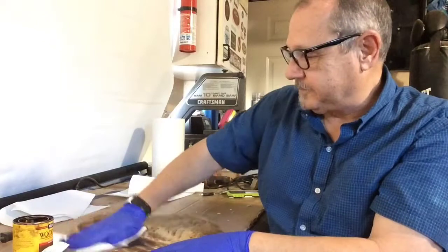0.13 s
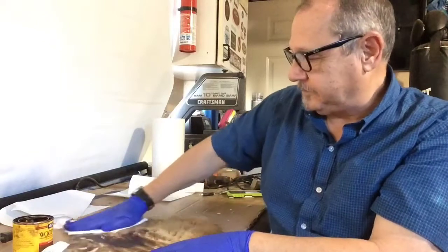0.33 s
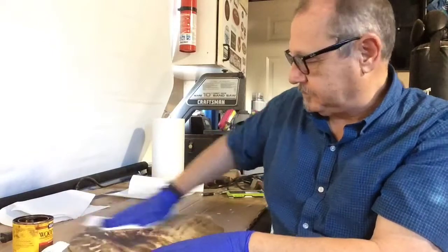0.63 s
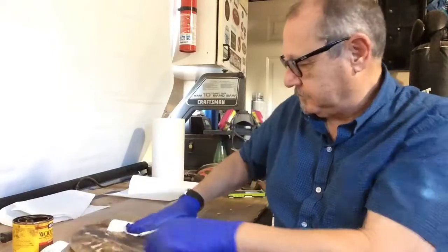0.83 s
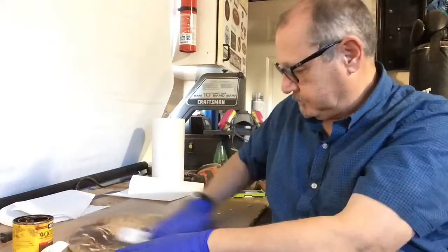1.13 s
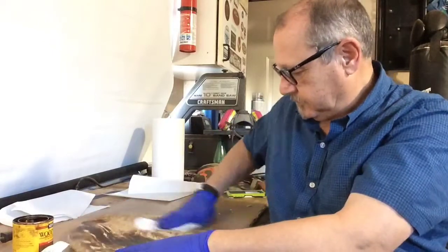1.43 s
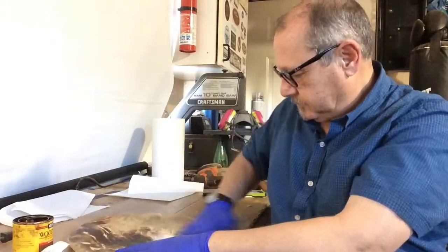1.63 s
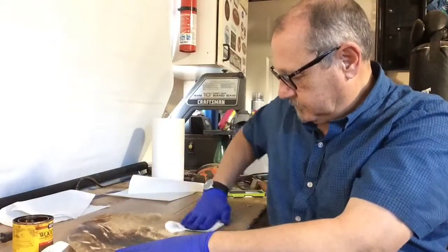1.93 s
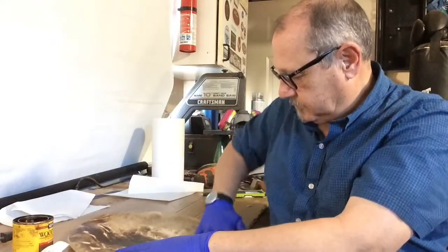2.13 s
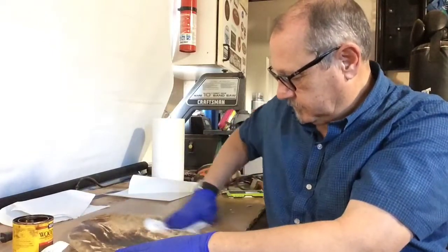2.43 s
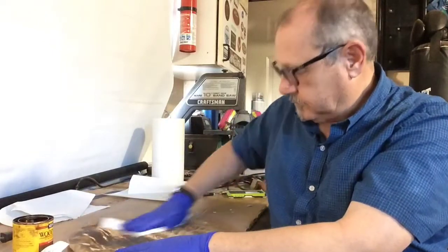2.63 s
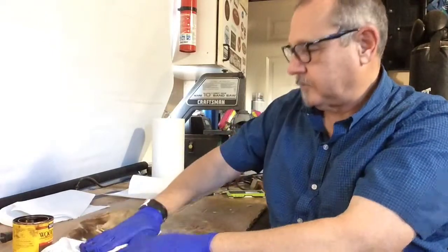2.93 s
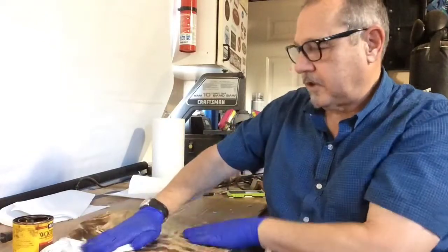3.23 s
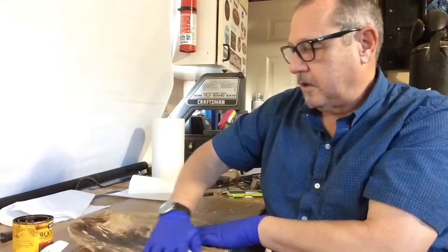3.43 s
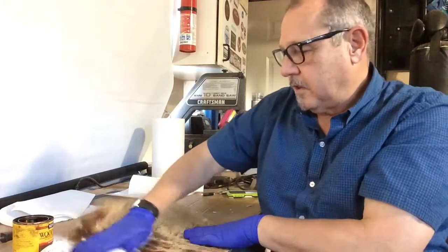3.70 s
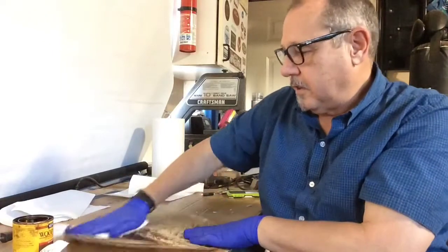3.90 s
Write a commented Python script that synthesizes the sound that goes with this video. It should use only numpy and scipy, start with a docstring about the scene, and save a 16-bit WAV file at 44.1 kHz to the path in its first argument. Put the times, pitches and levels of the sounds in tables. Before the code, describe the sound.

In a quiet workshop with faint low rumble, a gloved hand rubs a folded paper towel over a thin resonant piece on a bench, heard close in mono. At 0 s a stroke is already under way, its bright hiss and hollow droning boom fading by 0.25 s, with small crisp snaps. Softer strokes follow; a very faint throbbing tone around 700 Hz swells and vanishes by 0.8 s. A knock at 0.59 s and a sharp crackle with a thump at 0.93 s mark breaks. From 1 to 2.7 s the wiping hiss alternates steadily, with short quick strokes near 2 s and few clicks. Knocks and snaps cluster at 2.7-2.85 s, then the rub nearly stops around 3 s, with a light thud at 3.12 s. Fuller strokes resume from 3.36 s, crackles gather at 3.75 s, and at 3.99 s a hard woody knock and snapping creases meet the loudest, scrubbing stroke.

```python
"""A gloved hand wipes a paper towel to and fro over a thin resonant workpiece on a bench, lifting it twice.
From the first stroke on, fibres hiss, the folded pad scrubs and pressure makes the piece drone: coloured noise.
A pulsing tone swells under the first strokes and goes; creases snap and the piece knocks the bench throughout,
as filtered bursts. A low room rumble lies under it all, and one microphone feeds both channels."""
import sys
import numpy as np
from scipy import signal
from scipy.fft import rfft, irfft
from scipy.io import wavfile
from scipy.ndimage import uniform_filter1d

SR = 44100
rng = np.random.default_rng(int(sys.argv[2]) if len(sys.argv) > 2 else 0)


def file_out(sig):
    """Save sig as 16-bit WAV at sys.argv[1]."""
    # one column per channel
    cols = np.atleast_2d(sig).T
    # limit, then scale
    lim = np.clip(cols, -1, 1)
    pcm = np.round(lim * 32767).astype(np.int16)
    wavfile.write(sys.argv[1], SR, pcm)


N = 179134  # samples

# Strokes of the hand, from a turn, a landing or a fresh push to where the hand slows.
# Each row: start in seconds, end in seconds, hiss level in dB, its swell along the stroke in dB,
# treble level in dB relative to the hiss, the treble's swell in dB, drag level in dB, drone level in dB,
# and the swell of drag and drone with pressure in dB.
STROKES = [(-0.2, 0.233, -45, -2, -6, -0.5, -44.5, -45.5, -14.5),
           (0.187, 0.51, -52, -2, -15, 6, -49, -56, -7.5), (0.49, 0.676, -48.5, -5, -6, -6, -56.5, -59, 2),
           (0.72, 0.888, -56.5, -7.5, -10, -9.5, -57.5, -59.5, -8.5),
           (0.913, 1.154, -50.5, 1.5, -9.5, 6, -53, -56.5, -4),
           (1.097, 1.38, -50, 2.5, -6, 4.5, -49, -61, -8.5),
           (1.375, 1.625, -49.5, -0.5, -7, 0.5, -57.5, -68.5, 1),
           (1.614, 1.831, -46, -1, -7, 1.5, -52.5, -67, -0.5),
           (1.874, 1.98, -46.5, -4.5, -9, 1.5, -54.5, -60.5, -2),
           (1.962, 2.069, -44, -2, -6.5, 0, -48.5, -61.5, -4.5),
           (2.148, 2.504, -48.5, -1.5, -6, -1, -53, -64.5, -4.5),
           (2.417, 2.698, -48, 1, -5.5, 0.5, -55, -58.5, -5.5),
           (2.703, 2.832, -46.5, -2, 0.5, -12.5, -49, -48.5, -10.5),
           (2.872, 2.976, -50, -16, -23, -8, -55, -59.5, -9.5),
           (3.115, 3.305, -51.5, 3, -8, 7, -53, -57.5, -3.5),
           (3.362, 3.615, -45.5, -6.5, -6.5, -1, -56, -64, 0.5),
           (3.61, 3.923, -45, -1.5, -3.5, -7, -51, -54, -4.5),
           (3.905, 4.196, -39, -7, -12.5, -3.5, -43, -57, -0.5)]
LEAD = 256  # samples of silence before a burst


def gain_of(db):
    """Level: converts decibels to an amplitude factor."""
    return 10 ** (np.asarray(db) / 20)


def evened(x):
    """Normalisation by power: scales to rms 1."""
    return x / np.sqrt(np.mean(x ** 2) + 1e-20)


def peaked(x):
    """Normalisation by amplitude: scales to peak 1."""
    return x / abs(x).max()


def read(points, hz):
    """Interpolation: the level in dB of a spectrum on a log-frequency axis."""
    f, value = np.transpose(points)
    return np.interp(np.log(hz + 1), np.log(f + 1), value)


def shaped(x, points):
    """Linear filtering: multiplies the spectrum of x by a gain curve."""
    gain = gain_of(read(points, np.fft.rfftfreq(len(x), 1 / SR)))
    return irfft(rfft(x) * gain, len(x))


def coloured(x, points):
    """Spectral colouring: filters x by a gain curve and scales it to rms 1."""
    return evened(shaped(x, points))


def resonate(x, hz, width):
    """Resonance: one complex pole, about unit gain at hz, whose bandwidth in Hz sets the decay."""
    radius = np.exp(-np.pi * width / SR)
    pole = radius * np.exp(2j * np.pi * hz / SR)
    return 2 * signal.lfilter([1 - radius], [1, -pole], x).real


def piece(x):
    """Modal superposition: the workpiece is a sum of resonances of alternating sign."""
    # Each row: frequency in Hz, bandwidth in Hz, level in dB.
    modes = [(193, 55, 1), (338, 24, -10), (460, 75, 7), (689, 79, 13.5), (974, 30, 2), (1315, 56, -6),
             (2044, 45, 3.5)]
    return sum((-1) ** k * gain_of(db) * resonate(x, hz, width) for k, (hz, width, db) in enumerate(modes))


def grit(per_s, spread_db, smooth):
    """Stick-slip friction: sparse slips of uneven size as fibres catch, mixed with smooth noise."""
    size_db = spread_db * np.minimum(rng.exponential(1, N), 3.3)
    slips = gain_of(size_db) * (rng.random(N) < per_s / SR)
    signed_slips = slips * rng.choice([-1., 1.], N)
    share = np.clip(smooth, 0, 1)
    return share * rng.standard_normal(N) + (1 - share) * evened(signed_slips)


def crackles(count, t60, clump_db):
    """Transient excitation: clumped noise bursts, one a row, with a quick start and a faint long tail."""
    t = np.maximum(np.arange(8192) - LEAD, 0) / SR
    noise, clumps = rng.standard_normal((count, len(t), 2)).transpose(2, 0, 1)
    clump_gain = gain_of(clump_db * evened(uniform_filter1d(clumps, size=30, axis=1)))
    onset = 1 - np.exp(-t / 0.000057)
    decay = gain_of(-60 * t / t60) + 0.3 * gain_of(-60 * t / 0.25)
    return noise * clump_gain * onset * decay


def add(mix, s, sound):
    """Superposition: mixes a sound in at s seconds."""
    part = mix[round(s * SR):][:len(sound)]
    part += sound[:len(part)]


def column(count):
    """One parameter of the motion: a column of the strokes."""
    return np.transpose(STROKES)[count]


def strokes(t, level_db, swell_db, follows, leads_s=0):
    """Sound follows speed: the level in dB of a layer at times t, where the loudest stroke leads."""
    # A stroke starts slow, gathers speed, and dies away after its end; "follows" scales these dB per layer.
    turn_db, rise_s, fall_db_per_s = -7.5, 0.039, 135
    start, end = np.transpose(STROKES)[:2, :, None]
    since = np.maximum(t - start, 0)
    past_end = np.maximum(t - end + leads_s, 0)
    motion_db = turn_db * np.exp(-since / rise_s) - fall_db_per_s * past_end
    swell = swell_db[:, None] * np.minimum(since / (end - start), 1)
    db = level_db[:, None] + swell + follows * motion_db
    return np.where(t >= start, db, -200).max(axis=0)


def rumble():
    """Background noise: a low room rumble in uneven surges, with a faint circuit hiss."""
    # Each row: frequency in Hz, relative density in dB per Hz.
    room_spectrum = [(12, 7), (25, -1), (55, -5), (90, -12.5), (200, -11.5), (500, -30), (3000, -27),
                     (9000, -38), (16000, -39)]
    level_db = -61
    surge = evened(uniform_filter1d(rng.standard_normal(N), size=4000))
    return gain_of(level_db + 2.0 * surge) * coloured(rng.standard_normal(N), room_spectrum)


def hum():
    """Modulation of a carrier: slow noise rides on a wavering pitch that climbs, then sinks, in pulses."""
    level_db, beat_db, beats_per_s = -62, 3.5, 46
    start_s, rise_s, end_s = 0.057, 0.45, 0.79
    fade_db_per_s, fall_db_per_s = 3, 117  # the fall adds to the fade after end_s
    top_hz, top_s, sag_hz_per_s, waver_hz = 706, 0.48, 160, 7  # the pitch is lower before and after top_s
    t = np.arange(N) / SR
    waver, drift = (evened(uniform_filter1d(v, size=3000)) for v in rng.standard_normal((2, N)))
    hz = top_hz - sag_hz_per_s * abs(t - top_s) + waver_hz * waver
    carrier = np.exp(2j * np.pi * np.cumsum(hz) / SR)
    # The throb is uneven: its rate drifts.
    beats = np.cos(2 * np.pi * np.cumsum(beats_per_s * (1 + 0.256 * drift)) / SR)
    noise = rng.standard_normal(N) + 1j * rng.standard_normal(N)
    slow = signal.lfilter([1], [1, -np.exp(-np.pi * 20 / SR)], noise)  # 20 Hz wide
    tone = evened(((2.4 + slow / abs(slow).mean()) * carrier).real)
    fall_db = fade_db_per_s * t + fall_db_per_s * np.maximum(t - end_s, 0)
    rise = np.clip((t - start_s) / rise_s, 0, 1)
    return rise * gain_of(level_db + beat_db * beats - fall_db) * tone


def thuds():
    """Impact: a push and a short shudder ring the spot under the hand as the piece knocks the bench."""
    # Knocks, most of them dull. Each row: time in seconds, peak level in dB, centre frequency in Hz,
    # decay time (t60) of the shudder in seconds, width of the ring as a share of its centre.
    knocks = [(0.028, -57, 182, 0.051, 1.1), (0.271, -50, 201, .04, 2), (.586, -38, 2060, 0.011, 0.1),
              (0.587, -44, 560, .03, 0.54), (0.928, -42.5, 427, 0.07, 0.07), (0.94, -41.5, 150, 0.078, .9),
              (1.353, -53, 200, 0.036, 1.2), (2.018, -48.5, 404, 0.11, 1.1),
              (2.713, -39.5, 1190, 0.012, 0.27), (2.7245, -41.5, 485, 0.049, 0.5),
              (3.126, -47, 660, 0.04, .25), (3.121, -45, 230, 0.096, 1.2), (3.153, -48.5, 35, 0.19, 1.3),
              (3.29, -52, 35, 0.32, 0.98), (3.576, -53.5, 197, .05, 0.86), (3.748, -47, 300, 0.07, 0.82),
              (3.9885, -33.5, 490, 0.025, 0.48), (3.9899, -26.5, 1347, .02, 0.11)]
    # Bench under the hand. Each row: frequency in Hz, gain in dB.
    bench_spectrum = [(20, 5), (60, -1), (150, 8), (350, 6.5), (800, 0), (2000, -3)]
    out = np.zeros(N)
    t60 = np.transpose(knocks)[3][:, None]
    for (s, db, hz, _, breadth), shudder in zip(knocks, crackles(len(knocks), t60, clump_db=0.0)):
        push = 13.5 * (np.arange(len(shudder)) == LEAD)
        width = max(breadth, .05) * hz
        blow = shaped(shudder + push, bench_spectrum)
        ring = resonate(resonate(blow, hz, width), hz, 1.25 * width)
        add(out, s - LEAD / SR, gain_of(db) * peaked(ring))
    return out


def snaps():
    """Sudden release: a crease gives a click and a dying crackle around its centre, and rings the piece."""
    # Snapping creases, and the soft touch of the towel just before it lands at 0.913 s and 3.103 s. # Each row:
    # time in seconds, peak level of the crack in dB, centre frequency in Hz, # ring of the piece in dB relative
    # to that peak, decay time (t60) in seconds, sharpness of front (0 to 1).
    creases = [(.109, -33, 3550, -10, 0.027, 1), (.15, -26.5, 3320, -16.5, 0.014, 1),
               (0.2305, -30, 3350, -13, 0.017, 0.83), (0.268, -38, 2880, -4, 0.031, 0),
               (0.3158, -35.5, 2800, -21, 0.065, 0.05), (.369, -39, 2230, -5.5, 0.064, 0.53),
               (0.4472, -32.5, 1640, -10, 0.022, 0.36), (0.5847, -39, 3300, -28, .012, 0.46),
               (0.5869, -35, 3000, -14, 0.023, 0.45), (0.913, -43.5, 2500, -3, .06, 0.06),
               (.927, -33.5, 3750, -4.5, 0.009, 0), (0.9315, -31, 4300, -32, 0.013, 0.3),
               (0.9344, -19, 4360, -27.5, 0.023, 0.75), (0.9361, -28.5, 1720, -18, 0.035, 0.54),
               (0.9445, -26.5, 2050, -28, 0.028, 0.4), (1.159, -38, 2800, -12, 0.049, 0.74),
               (1.355, -36.5, 4520, -13, 0.016, 0.04), (1.54, -35, 3930, -16, 0.027, 0.63),
               (2.623, -38.5, 1690, -8, 0.033, 0.44), (2.7142, -27.5, 3300, -13, 0.012, 0.54),
               (2.7227, -30.5, 2870, -18, 0.011, 0.5), (2.7252, -29, 3200, -15, 0.012, 0.63),
               (2.755, -38, 2900, -8, 0.018, 0.4), (2.8527, -24, 2850, -22, 0.015, 0.66),
               (2.951, -38.5, 1500, -8.5, 0.024, 0.76), (3.103, -55, 2500, -3, 0.062, 0),
               (3.1203, -35, 3840, -8.5, 0.041, 0.8), (3.128, -35, 2460, -12, 0.046, 0.55),
               (3.225, -39, 2980, -21, .035, 0), (3.577, -37.5, 1800, -9, 0.055, 0.3),
               (3.679, -34, 3300, -33, 0.011, 0.5), (3.684, -30.5, 4600, -19, 0.019, 0.4),
               (3.717, -39.5, 1520, -6, 0.012, 0), (3.7449, -29.5, 2940, -24, 0.015, 0.38),
               (3.7465, -25, 5160, -32, 0.03, 0.48), (3.773, -27, 2430, -19, 0.034, 0.7),
               (3.937, -36, 1380, -8, 0.029, 0.2), (3.972, -37, 4100, -31, .03, 0.1),
               (3.977, -25, 3800, -20, 0.0092, 0.25), (3.9893, -21.5, 2300, -12.5, 0.026, 0.53),
               (4.007, -25.5, 1450, -16, 0.01, 0.36), (4.0148, -25, 2090, -25, 0.045, 0.4),
               (4.046, -25, 4100, -17, 0.022, 0.42)]
    # Breadth of a snap. Each row: frequency in Hz, gain in dB.
    crease_spectrum = [(100, -18), (500, 10.5), (1200, 15.5), (1700, 12), (3200, 16.5), (5000, 12),
                       (7000, -6), (10000, -29), (16000, -64)]
    out = np.zeros(N)
    t60 = np.maximum(np.transpose(creases)[4][:, None], .003)
    for (s, db, hz, ring_db, _, front), crackle in zip(creases, crackles(len(creases), t60, clump_db=3.0)):
        front = np.clip(front, 0, 1)
        click = -12 * front * (np.arange(len(crackle)) == LEAD)
        burst = (1 - 0.49 * front) * crackle + click
        centre = resonate(resonate(burst, hz, width=0.16 * hz), hz, width=2.7 * hz)
        crack = peaked(centre) + 1.86 * peaked(shaped(burst, crease_spectrum))
        ring = gain_of(ring_db) * peaked(piece(burst))
        add(out, s - LEAD / SR, gain_of(db) * (peaked(crack) + ring))
    return out


def drone():
    """Forced vibration: pressure shakes the piece into a broad boom and its modes."""
    # Boom. Each row: frequency in Hz, relative density in dB per Hz.
    boom_spectrum = [(60, -12), (130, -29), (300, 1), (600, -6), (1000, -3.5), (1800, -35)]
    shake = grit(per_s=220, spread_db=2.0, smooth=0.35)
    sound = evened(coloured(shake, boom_spectrum) + 1.37 * evened(piece(shake)))
    level_db = strokes(np.arange(N) / SR, column(count=7), column(count=8), follows=0.65)
    return gain_of(level_db) * sound


def drag():
    """Coarse friction: the folded pad scrubs with coarser, lower grain."""
    # Each row: frequency in Hz, relative density in dB per Hz.
    scrub_spectrum = [(500, -22), (900, -6), (1200, -5), (1600, -6), (2400, -4.5), (3500, -8), (6000, -38)]
    scrub = coloured(grit(per_s=1000, spread_db=0.0, smooth=0.84), scrub_spectrum)
    level_db = strokes(np.arange(N) / SR, column(count=6), column(count=8), follows=1)
    return gain_of(level_db) * scrub


def hiss():
    """Fine friction: fibre noise in drifting patches; a faster stroke lifts the treble."""
    # Fibres. Each row: frequency in Hz, relative density in dB per Hz.
    fibre_spectrum = [(880, -15.5), (1500, -16), (2080, -14.5), (2700, -8.5), (3300, -4), (4730, -2),
                      (6500, -6.5), (8000, -12), (10500, -15), (16000, -25)]
    treble_db = -5.5  # treble level of a stroke at which the hiss has the spectrum above
    fibres = coloured(grit(per_s=2500, spread_db=3.0, smooth=0.64), fibre_spectrum)
    hz, t, z = signal.stft(fibres, SR, nperseg=256, noverlap=192)
    drifting = uniform_filter1d(rng.standard_normal(z.shape), size=40, axis=1)  # smoothed along time
    patches = evened(uniform_filter1d(drifting, size=5, axis=0))  # and along frequency
    flutter = evened(uniform_filter1d(rng.standard_normal(len(t)), size=14))  # the pad wobbles
    # The treble takes over from 5500 Hz, fully about half an octave higher.
    treble = np.clip(np.log(hz / 5500 + 1e-9) / 0.34, 0, 1)[:, None]
    body_db = strokes(t, column(count=2), column(count=3), follows=1.0)
    # The treble dies before the hand has stopped.
    top_level_db = column(count=2) + column(count=4) - treble_db
    top_db = strokes(t, top_level_db, column(count=5), follows=1.05, leads_s=0.013)
    level_db = body_db + treble * (top_db - body_db)
    z = z * gain_of(level_db + 0.67 * patches + .5 * flutter)
    return signal.istft(z, SR, nperseg=256, noverlap=192)[1][:N]


def scene():
    """Superposition: all sources add at one microphone, which feeds both channels."""
    mono = rumble() + hum() + thuds() + snaps() + drone() + drag() + hiss()
    return np.array([mono, mono])


def record(dry):
    """Transducer response: the notch of the microphone's port, then a low-pass band limit."""
    # Microphone. Each row: frequency in Hz, gain in dB.
    mic_response = [(20, -3), (11000, 2.5), (12300, -1.5), (13300, -12), (14300, -1.5), (15300, 6),
                    (17000, -14)]
    edge_hz = 15800
    heard = np.array([shaped(channel, mic_response) for channel in dry])
    low_pass = signal.firwin(1023, edge_hz, window=("kaiser", 10), fs=SR)
    return signal.oaconvolve(heard, low_pass[None], "same")


dry = scene()
out = record(dry)
file_out(out)
```